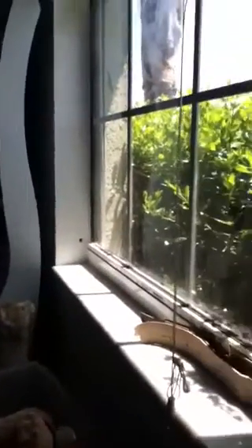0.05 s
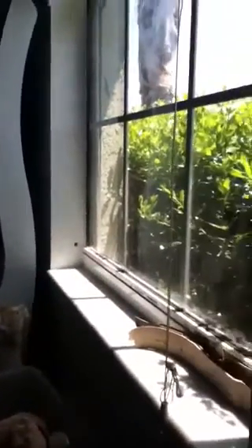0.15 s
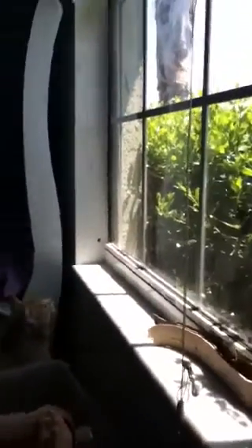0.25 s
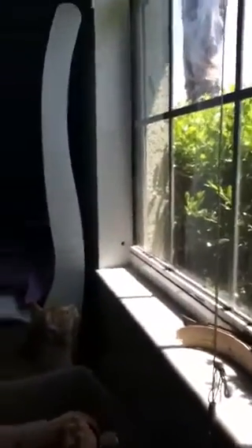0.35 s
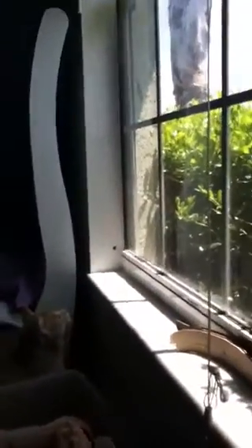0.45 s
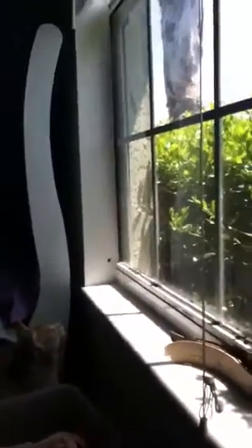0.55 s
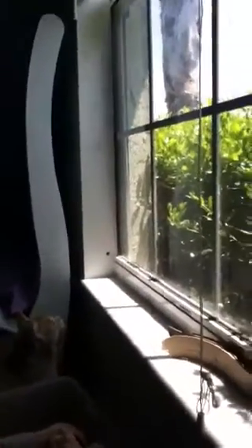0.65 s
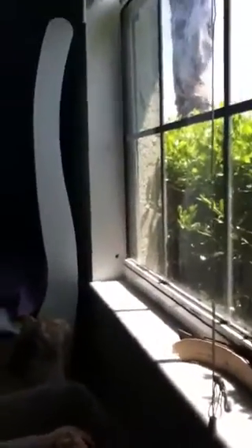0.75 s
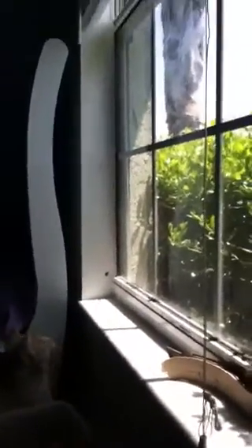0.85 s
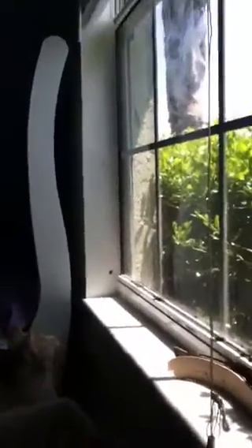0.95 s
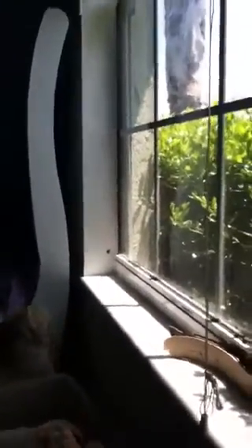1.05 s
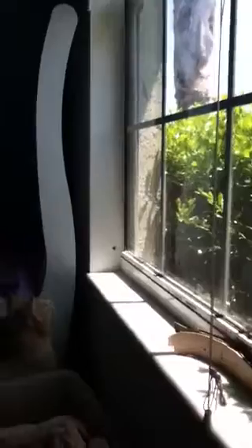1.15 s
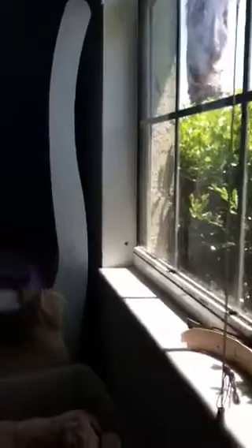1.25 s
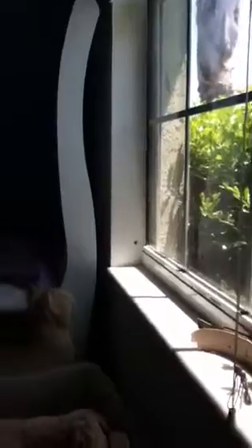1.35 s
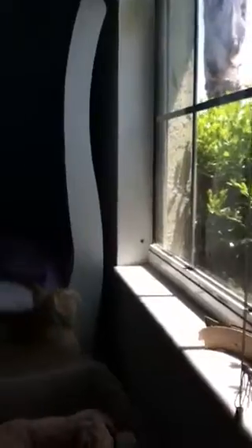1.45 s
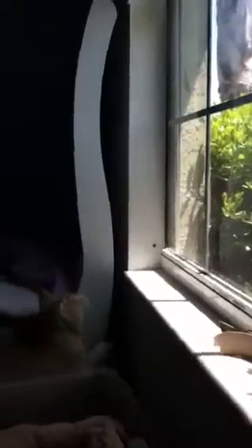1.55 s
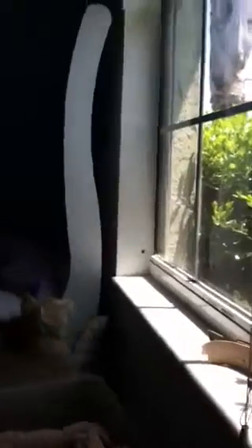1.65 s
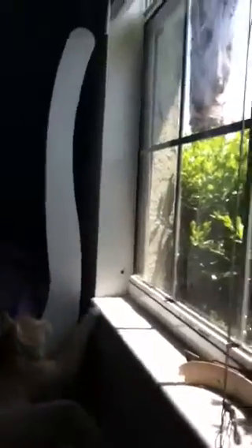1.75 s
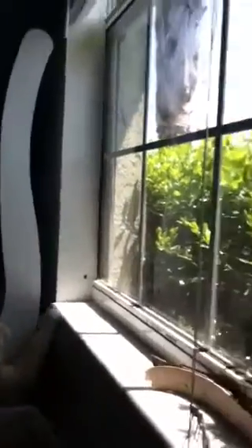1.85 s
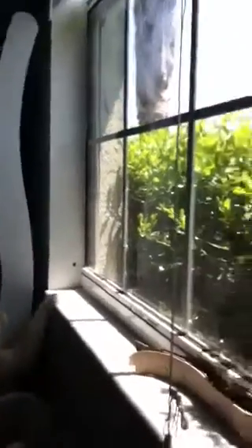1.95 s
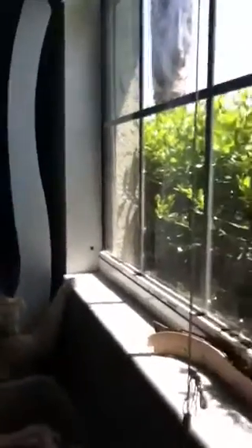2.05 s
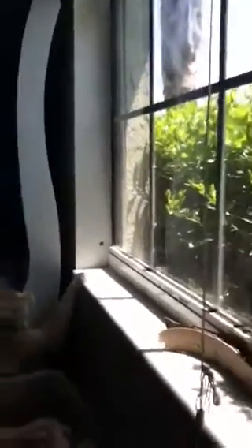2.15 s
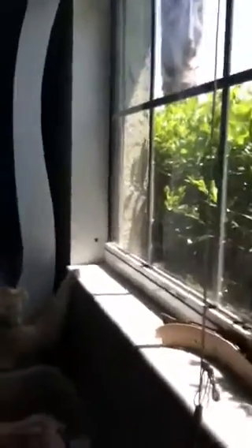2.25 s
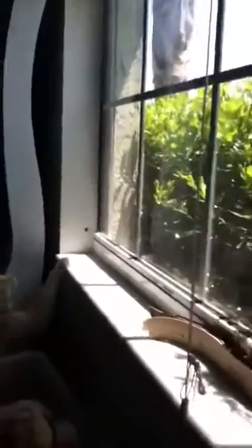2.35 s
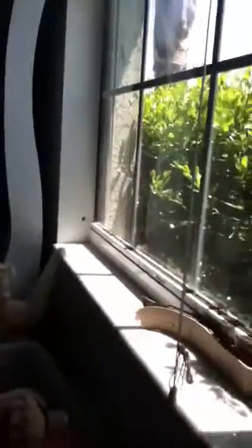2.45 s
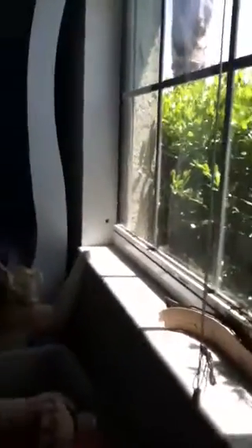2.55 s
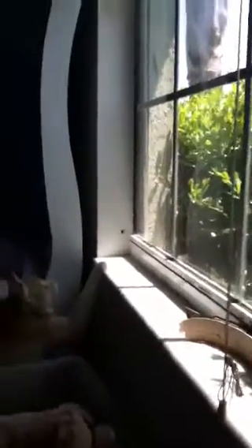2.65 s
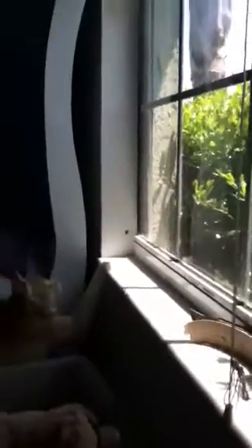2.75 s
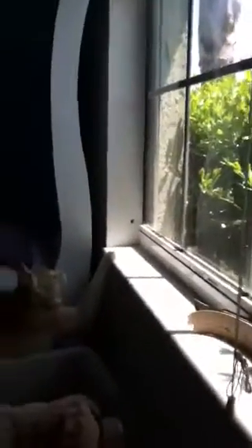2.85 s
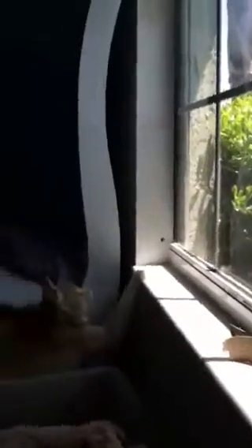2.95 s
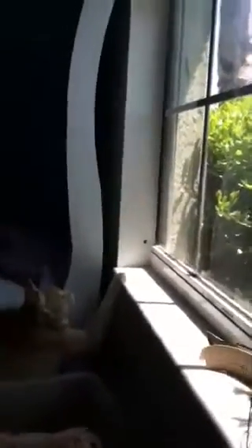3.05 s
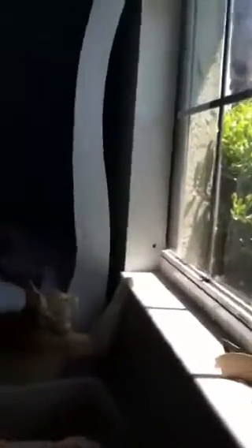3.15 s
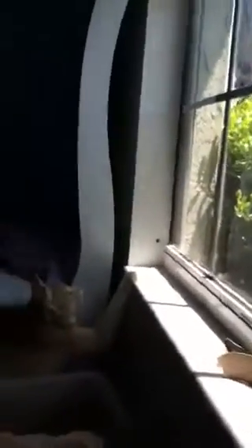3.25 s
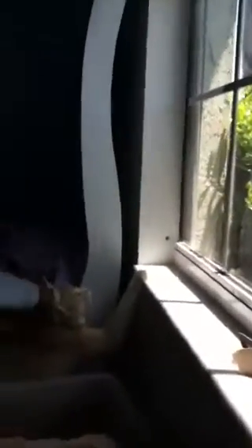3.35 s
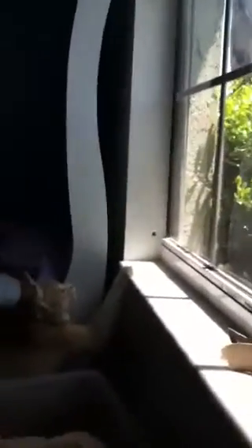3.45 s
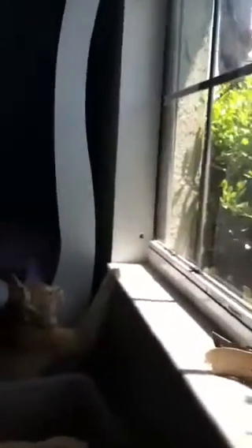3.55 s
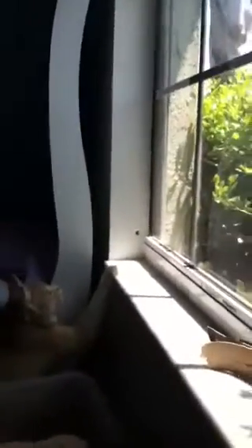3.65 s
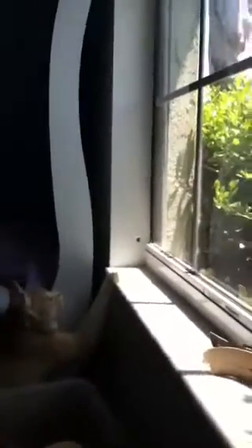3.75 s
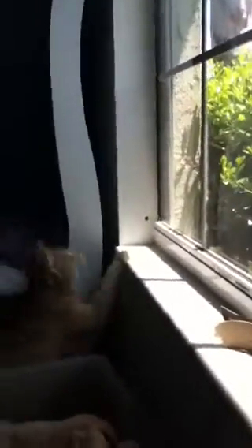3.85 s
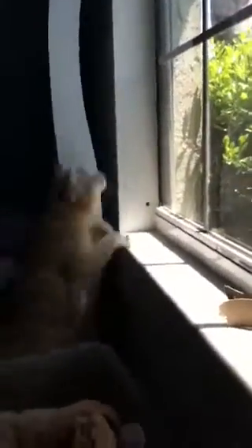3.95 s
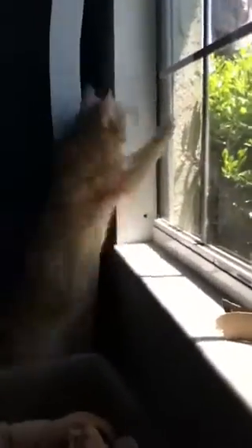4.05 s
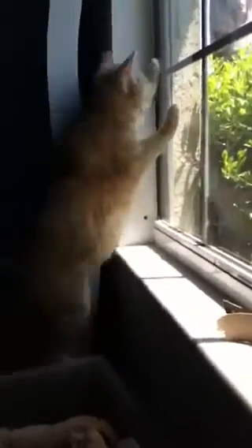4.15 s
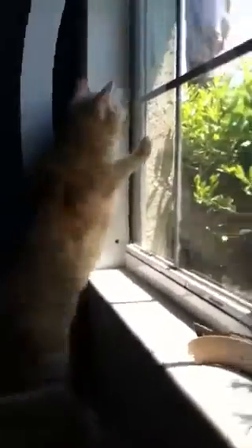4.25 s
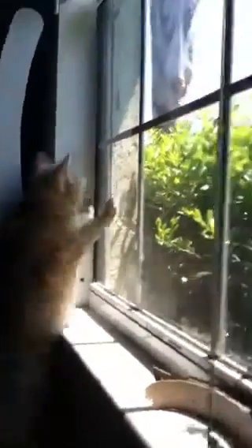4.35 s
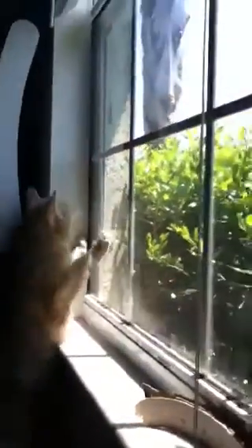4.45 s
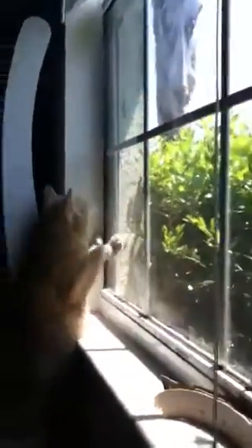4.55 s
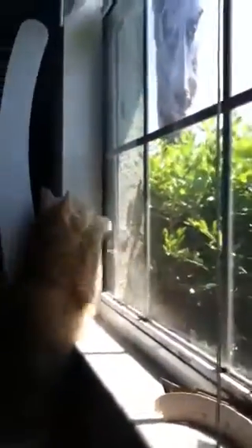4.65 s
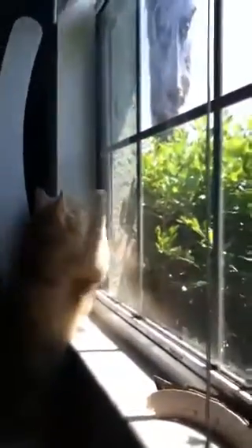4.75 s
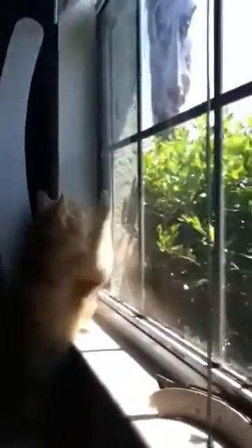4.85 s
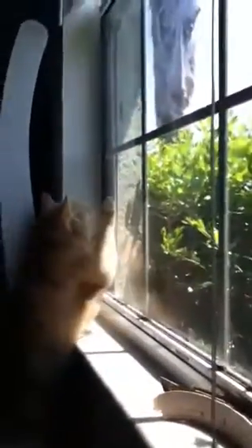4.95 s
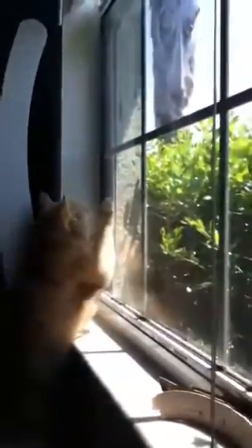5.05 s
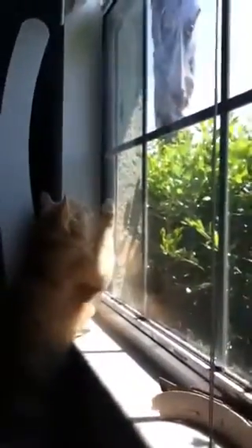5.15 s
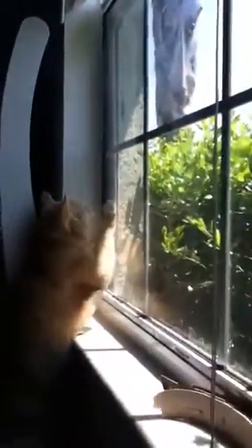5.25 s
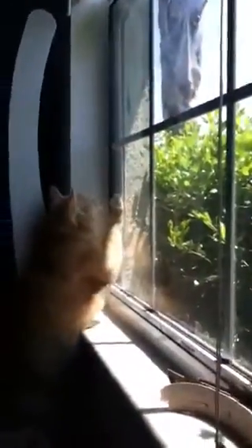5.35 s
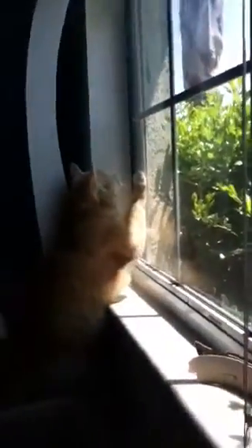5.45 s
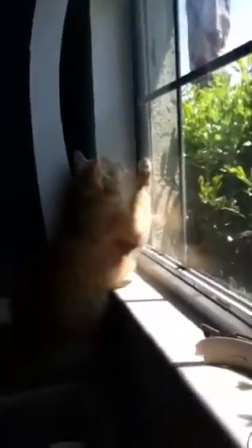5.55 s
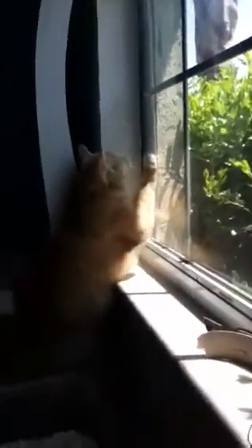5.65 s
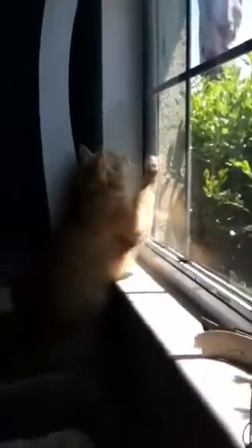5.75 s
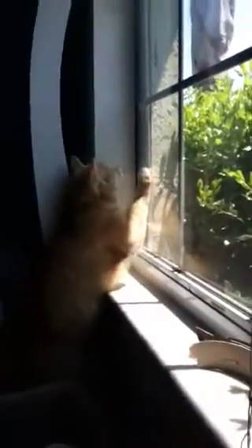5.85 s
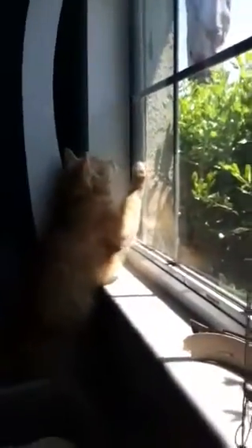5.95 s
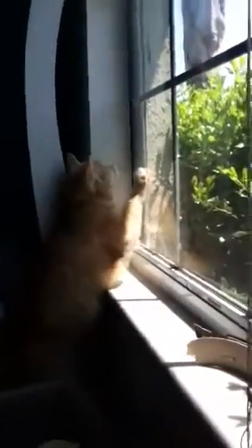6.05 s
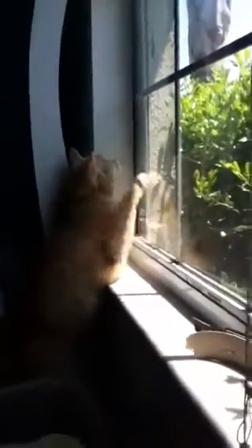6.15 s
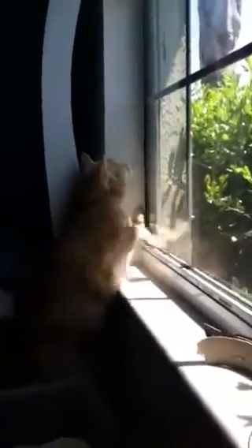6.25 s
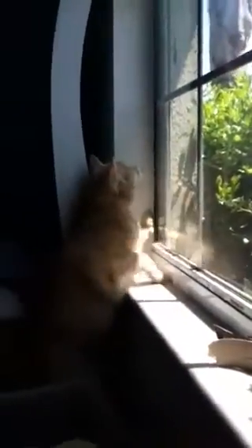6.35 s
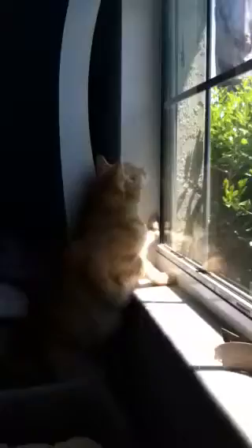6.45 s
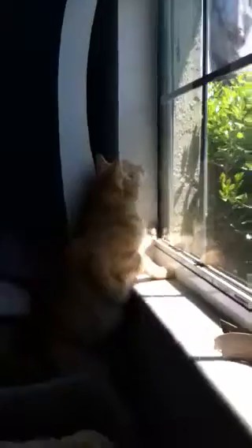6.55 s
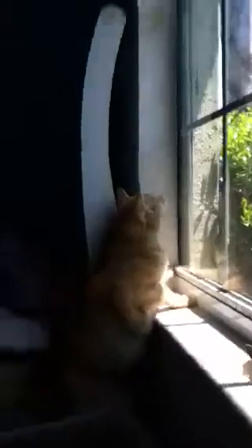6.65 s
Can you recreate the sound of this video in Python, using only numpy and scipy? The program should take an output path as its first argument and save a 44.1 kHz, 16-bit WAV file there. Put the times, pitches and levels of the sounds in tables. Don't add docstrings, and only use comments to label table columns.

```python
import sys
import numpy as np
from scipy import signal
from scipy.fft import rfft, irfft
from scipy.io import wavfile

SR = 44100
rng = np.random.default_rng(int(sys.argv[2]) if len(sys.argv) > 2 else 0)


def elevation(decibels):
    levels = np.asarray(decibels, float)
    return 10 ** (levels / 20)


def store_pcm(level_fs):
    pcm = np.round(np.clip(level_fs, -1, 1) * 32767).astype(np.int16)
    wavfile.write(sys.argv[1], SR, np.atleast_2d(pcm).T)


N = 295906


def rms_one(x):
    return x / np.sqrt(np.mean(x ** 2) + 1e-20)


def at_hz(points, hz):
    table_hz, values = np.array(points)[:, 0], np.array(points)[:, 1]
    return np.interp(np.log(np.maximum(hz, 1)), np.log(table_hz), values)


def band(x, low_hz, high_hz):
    return signal.sosfilt(signal.butter(2, [low_hz, high_hz], "band", fs=SR, output="sos"), x)


def band_shape(hz, low_hz, high_hz):
    return 1 / np.sqrt((1 + (low_hz / hz) ** 4) * (1 + (hz / high_hz) ** 4))


def ring(force, hz, t60):
    r, w = elevation(-60 / (t60 * SR)), 2 * np.pi * hz / SR
    return signal.lfilter([0, np.sin(w)], [1, -2 * r * np.cos(w), r * r], force + 1e-18)


def resonance(x, hz, width_hz):
    r = np.exp(-np.pi * width_hz / SR)
    poles = [1, -2 * r * np.cos(2 * np.pi * hz / SR), r * r]
    return signal.lfilter((1 - r * r) / 2 * np.array([1, 0, -1]), poles, x)


def blow(contact_s, size):
    t = np.arange(size) / SR
    return np.sin(np.pi * np.minimum(t / contact_s, 1)) ** 2


def add(out, s, sound, peak_db):
    at = max(round(s * SR), 0)
    sound = sound[:N - at]
    out[at:at + len(sound)] += elevation(peak_db) * sound / np.max(np.abs(sound))


def strokes(rows):
    t = np.arange(N) / SR
    rise, fall = 0.22, 0.57
    gain = np.zeros(N)
    for s, length, db in rows:
        shape = np.minimum((t - s) / rise, (s + length - t) / fall) / length
        gain += elevation(db) * np.clip(shape, 0, 1) ** 0.92
    return gain


# f/Hz, density/dB per Hz
HISS_SPECTRUM = [(20, 9), (58, -3), (83, -7), (228, -17), (1330, -30.5), (9400, -33.5), (14700, -37.5),
                 (16000, -30)]
# f/Hz, width/Hz, rms level/dB
HUM_BANDS = [(30.1, 10.6, -53.5), (58.5, 12, -52), (123.3, 9.7, -67)]
# f/Hz, level/dB
MAINS_LINES = [(29.8, -54), (59.6, -69)]
HISS_DB = -61
WHINE_HZ, WHINE_DB = 14992, -80


def room_tone():
    hz = np.fft.rfftfreq(N, 1 / SR)
    colour = elevation(at_hz(HISS_SPECTRUM, hz)) * band_shape(hz + 1, 56, 30000)
    hiss = irfft(rfft(rng.standard_normal(N)) * colour, N)
    out = hiss * elevation(HISS_DB + 1.5) / np.std(band(hiss, 370, 16400))
    for line_hz, width, db in HUM_BANDS:
        noise = rng.standard_normal(N + SR)
        hum = resonance(resonance(noise, line_hz, width), line_hz, width)
        out += elevation(db) * rms_one(hum[SR:])
    for line_hz, db in MAINS_LINES + [(WHINE_HZ, WHINE_DB)]:
        out += elevation(db) * np.sin(2 * np.pi * line_hz * np.arange(N) / SR)
    return out


# t/s, peak level/dB, ring f/Hz, room level/dB
DULL_KNOCKS = [(0.028, -31.5, 1000, -43), (0.229, -32.5, 1030, -37), (0.579, -45.5, 816, -18),
               (0.627, -57, 890, -23), (0.783, -47, 900, -13), (0.864, -61, 1010, -7),
               (1.139, -51, 1100, -30), (1.559, -43, 587, -24), (1.59, -44, 806, -27),
               (1.629, -49.5, 810, -32), (2.902, -41.5, 880, -16), (2.925, -49, 970, -24),
               (3.177, -40, 1200, -6.5), (3.253, -50, 886, -24), (3.301, -44.5, 695, -10),
               (3.898, -55, 660, -6.5), (6.521, -58, 800, -7), (6.602, -57, 750, -7)]
# t/s, peak level/dB, ring f/Hz, room level/dB
HARD_RAPS = [
    (0.002, -35, 610, -40),
    (1.812, -47, 800, -17),
    (1.921, -41.5, 836, -14),
    (3.374, -59, 916, -9),
    (4.029, -53.5, 1160, -14),
    (4.171, -37.5, 1090, -19),
    (4.232, -36.5, 590, -22),
    (4.462, -31.5, 1250, -5),
    (5.43, -48.5, 1360, -8),
]
KNOCK_CRACK_DB, RAP_CRACK_DB = -19, -7
FAINT_DB, FAINT_T60_S = -56.5, 0.015
DAMPING = 0.81


def knocks():
    near, send = np.zeros((2, N))
    t = np.arange(2000) / SR
    hits = [(*row, KNOCK_CRACK_DB) for row in DULL_KNOCKS] + [(*row, RAP_CRACK_DB) for row in HARD_RAPS]
    for s, db, hz, room_db, crack_db in hits:
        t60 = FAINT_T60_S * elevation(DAMPING * (FAINT_DB - db))
        push = blow(0.00054, size=2000)
        body = ring(push, hz, max(t60, .0042)) + 0.5 * push * push.sum() / 20
        crack = band(rng.standard_normal(2000), 2500, 5800) * elevation(-60 * t / 0.0058)
        add(near, s, body, db + 7.5)
        add(near, s, crack, db + crack_db + 11.5)
        add(send, s, body, db + room_db)
    return near, send


# t/s, peak level/dB
MATTRESS_PATS = [
    (0.029, -37),
    (.23, -38),
    (0.579, -38.5),
    (1.559, -37),
    (1.589, -33),
    (1.626, -35),
    (1.92, -47),
    (1.954, -40),
    (2.861, -41.5),
]
PAT_HZ, PAT_T60_S, PAT_CONTACT_S = 155, 0.018, 0.0019


def pats():
    out = np.zeros(N)
    for s, db in MATTRESS_PATS:
        add(out, s, -ring(blow(PAT_CONTACT_S, size=3000), PAT_HZ, PAT_T60_S), db)
    return out


# t/s, length/s, dull level/dB, bright level/dB
FUR_STROKES = [
    (1.104, 0.18, -61, -59),
    (1.234, 0.072, -63, -82),
    (5.165, 0.24, -60.5, -72),
    (5.713, 0.2, -56.5, -65),
    (6.152, 0.2, -50.5, -61),
    (6.52, 0.42, -53.5, -61),
]
# t/s, length/s, level/dB
BEDDING_RUSTLES = [
    (1.816, 0.25, -57),
    (2.387, 0.35, -59),
    (2.855, 0.9, -61),
]
GLASS_HISS = (5.6, .32, -64)
GLASS_HISS_HZ, GLASS_HISS_WIDTH_HZ = 6200, 2600


def brushing():
    grain_size = elevation(3.0 * np.minimum(rng.exponential(1, (3, N)), 3))
    hair, tips, folds = rng.standard_normal((3, N)) * grain_size
    dull = band(hair, 247, 900) + 0.72 * band(hair, 1580, 2420)
    bright = band(tips, 2550, 9200)
    cloth = band(folds, 1420, 3900) + 2.07 * band(folds, 520, 980)
    hiss = resonance(tips, GLASS_HISS_HZ, GLASS_HISS_WIDTH_HZ)
    hiss = resonance(hiss, GLASS_HISS_HZ, GLASS_HISS_WIDTH_HZ)
    s, length, dull_db, bright_db = np.transpose(FUR_STROKES)
    out = strokes(zip(s, length, dull_db)) * rms_one(dull)
    out += strokes(zip(s, length, bright_db)) * rms_one(bright)
    out += strokes(BEDDING_RUSTLES) * rms_one(cloth)
    return out + strokes([GLASS_HISS]) * rms_one(hiss)


# t/s, peak level/dB, higher board modes level/dB, edge modes level/dB, rattle level/dB
PAD_THUMPS = [
    (1.24, -41.5, -4, -26, -7.5),
    (1.703, -18, -4, -44, -16.5),
    (2.287, -21.5, -15, -7.5, -21),
    (2.365, -25.5, 4, -32, -19),
    (3.115, -22, -18.5, -11, -30),
    (3.176, -32, 8.5, 14.5, -33),
    (3.586, -40, -7, -6, -11.5),
]
# f/Hz, level/dB, t60/s, family (whole part: 0 lowest, 1 upper, 2 edge, 3 second)
SILL_MODES = [(104.2, -2, 0.098, 1.5), (166, 0, 0.082, 3), (203.2, -3, 0.1, 1), (240, -4.5, 0.16, 2.5),
              (290, -11.5, 0.2, 3), (349, -8, 0.091, 2.5), (443.6, -3, 0.079, 2), (512, -18, 0.032, 3.5),
              (620, -16.5, 0.048, 1.5), (790, -5, 0.1, 1)]


def thumps():
    out, t = np.zeros(N), np.arange(16000) / SR
    pushes = [blow(contact_s, size=len(t)) for contact_s in (0.004, 0.0019, 0.00079, 0.0043)]
    for s, db, upper_db, edge_db, rattle_db in PAD_THUMPS:
        family_db = [0, upper_db + 11.5, edge_db - 0.5, upper_db + 10]
        sound = np.zeros(len(t))
        for hz, mode_db, t60, family in SILL_MODES:
            k = int(family)
            level_db = mode_db + family_db[k] + rng.normal(0, 1.5)
            sound += elevation(level_db) * ring(pushes[k] / pushes[k].sum(), hz, t60)
        rattle = band(rng.standard_normal(len(t)), 560, 1024)
        rattle *= elevation(-60 * t / 0.19) * np.minimum(t / 0.0013, 1)
        start = s + .0035
        add(out, start, -band(sound, 90, 6000), db + 4.0)
        add(out, start, rattle, db + rattle_db)
    return out


# t/s, peak level/dB, strongest f/Hz, room level/dB
CLAW_TOUCHES = [(1.7111, -36.5, 3800, -3.5), (2.3719, -40, 3270, -3), (2.8598, -38.5, 2650, -5),
                (3.1776, -41.5, 2370, -12), (3.2527, -49.5, 2420, -4), (4.1648, -9, 7800, -11.5),
                (4.226, -9.5, 7200, -15), (4.2871, -31.5, 3230, -6.5), (4.358, -32, 2660, -5),
                (4.4348, -38, 2850, -7), (4.8821, -25.5, 7000, -9), (5.9768, -48, 6000, 0),
                (6.3994, -50, 6400, 3), (6.664, -37, 5530, -0.5),
                (4.1934, -32, 9100, -17),
    (4.2169, -29.5, 6100, 9),
    (4.241, -38, 7000, -10),
    (4.257, -30, 9600, -6),
    (1.754, -52, 4200, -17),
    (4.288, -28.5, 7000, -8),
    (4.4264, -44, 6100, 10),
]
# f/Hz, level/dB, t60/s
GLASS_MODES = [(4100, -5, .006), (5150, -11, .007), (5950, -8, .005), (6950, 0, .005), (8100, -2, .004),
               (9300, -2, .004), (10900, -4, .003), (13600, -26, .003)]
# delay/s, level/dB
EDGE_RETURNS = [(.0005, -3), (.0009, -2), (.0015, -9), (.0022, -13), (.0029, -15), (.0037, -14),
                (.0048, -19), (.006, -20), (.0075, -22)]
FRAME_HZ, FRAME_RING_S = 2700, .005
FRAME_BODY_DB, BODY_DB_PER_OCTAVE = 6, -13.5


def claws():
    near, send = np.zeros((2, N))
    hz = np.fft.rfftfreq(4096, 1 / SR) + 1
    dispersion = np.exp(-2j * np.pi * 0.17 * np.sqrt(hz))
    duller = band_shape(hz, 250, 5700)
    soft_tip = band_shape(hz, 50, 13200) ** 2 / np.sqrt(1 + (hz / 13500) ** 12)
    for s, db, top_hz, room_db in CLAW_TOUCHES:
        octaves = np.log2(hz / top_hz)
        slope_db = np.where(octaves < 0, 14 * octaves, -3 * octaves)
        body_db = FRAME_BODY_DB + BODY_DB_PER_OCTAVE * np.log2(top_hz / FRAME_HZ)
        body = elevation(body_db) * band_shape(hz, 170, 1250)
        returns = 1
        for late_s, echo_db in EDGE_RETURNS:
            delay_s = late_s * rng.normal(1, .12)
            returns = returns + elevation(echo_db) * np.exp(-2j * np.pi * hz * delay_s)
        tick = irfft((elevation(slope_db) + body) * soft_tip * dispersion * returns)
        modes = sum(elevation(mode_db + 2.0 * rng.normal()) * ring(tick, mode_hz, mode_t60)
                    for mode_hz, mode_db, mode_t60 in GLASS_MODES)
        t60 = max(FRAME_RING_S * (FRAME_HZ / top_hz) ** 2, .001)
        frame = FRAME_HZ / top_hz * ring(tick, top_hz, t60)
        add(near, s - .0008, tick + .15 * modes + .35 * frame, db + 2)
        to_room = irfft((elevation(0.86 * slope_db) * duller + body) * dispersion)
        add(send, s, to_room, db + room_db + 1.5)
    return near, send


# t of the fall/s, level/dB, top f/Hz
BIRD_WHISTLES = [
    (3.762, -62, 3150),
    (4.745, -59, 3000),
    (5.27, -59, 3050),
    (5.79, -59, 3050),
    (6.305, -58, 2950),
]
LEAD_S, LEAD_RISE_HZ = .055, 100
FALL_S, FALL_HZ, FADE_S = .062, 800, .035


def bird():
    out, t = np.zeros(N), np.arange(SR // 4) / SR
    corners = np.cumsum([0, LEAD_S, FALL_S, FADE_S])
    for s, db, top_hz in BIRD_WHISTLES:
        pitch_noise, level_noise = rng.standard_normal((2, len(t)))
        waver = 1 + 0.01 * rms_one(band(pitch_noise, 7.8, 80))
        pitch = top_hz - np.interp(t, corners, [LEAD_RISE_HZ, 0, FALL_HZ, FALL_HZ])
        broken_db = 2.5 * rms_one(band(level_noise, 15, 90))
        swell = elevation(np.interp(t, corners, [-9, 0, -1, -25], right=-80) + broken_db)
        add(out, s - LEAD_S, swell * np.sin(2 * np.pi * np.cumsum(pitch * waver) / SR), db)
    return out


# t/s, push level/dB
PANE_PUSHES = [
    (4.167, -23),
    (4.203, -21.5),
    (4.244, -23),
    (4.344, -37),
    (4.399, -30.5),
    (4.446, -29),
]
# f/Hz, level/dB, t60/s
PANE_MODES = [(22.1, 4.5, 0.29), (50, -5, 0.46), (95.4, -11, 0.49), (135, -7, 0.22), (320, -9, 0.14),
              (396, 0.5, 0.11)]


def pane():
    force = np.zeros(N)
    for s, db in PANE_PUSHES:
        add(force, s, blow(0.0034, size=600), db - 45.0)
    return sum(elevation(db) * ring(force, hz, t60) for hz, db, t60 in PANE_MODES)


# t/s, peak level/dB, f/Hz, t60/s
LATCH_PING = (4.288, -33, 3200, .03)


def latch():
    out = np.zeros(N)
    s, db, hz, t60 = LATCH_PING
    add(out, s, ring(blow(0.00018, size=3000), hz, t60), db)
    return out


# t/s, length/s, level/dB, bright part level/dB
CLAW_DRAGS = [
    (4.358, 0.026, -59, -25),
    (4.464, 0.0098, -44, 9),
    (4.473, 0.013, -36, -18),
    (4.48, 0.029, -59.5, 14),
    (5.444, 0.038, -58, -24),
]
# f/Hz, width/Hz, level/dB
SCRAPE_MODES = [(1140, 180, 13), (1740, 280, 8), (3280, 650, 12.5), (7000, 2300, -7)]


def drags():
    slip_size = elevation(3.5 * np.minimum(rng.exponential(1, N), 2.5))
    slips = rms_one((rng.random(N) < 7000 / SR) * slip_size * rng.choice([-1, 1], N))
    dull, bright, t = np.zeros(N), np.zeros(N), np.arange(N) / SR
    for s, length, db, bright_db in CLAW_DRAGS:
        touch = elevation(db) * np.clip(np.minimum((t - s) / 0.001, (s + length - t) / (0.38 * length)), 0, 1)
        dull += touch
        bright += elevation(bright_db) * touch
    *low_modes, (top_hz, top_width, top_db) = SCRAPE_MODES
    top = resonance(resonance(bright * slips, top_hz, top_width), top_hz, top_width)
    out = elevation(top_db + 14.0) * top
    for hz, width, db in low_modes:
        out += elevation(db + 7.5) * resonance(dull * slips, hz, width)
    return out, band(dull * slips, 510, 7700)


# f/Hz, t60/s
ROOM_DECAY = [(150, 0.26), (600, 0.39), (2000, 0.32), (6000, 0.28), (12000, 0.52)]


def room(x):
    t = np.arange(SR // 2) / SR
    onset = np.clip((t - .003) / 0.00043, 0, 1)
    tail = np.zeros(len(t))
    for hz in 100 * 2. ** np.arange(8):
        reflections = band(rng.standard_normal(len(t)) * onset, hz / np.sqrt(2), hz * np.sqrt(2))
        tail += reflections * elevation(-60 * t / at_hz(ROOM_DECAY, hz))
    tail = band(tail, 45, 8500)
    return signal.fftconvolve(x, tail / np.sqrt(np.sum(tail ** 2)))[:N]


def scene():
    knock, knock_send = knocks()
    claw, claw_send = claws()
    scrape, scrape_send = drags()
    sill, song = thumps(), bird()
    wet = elevation(12) * knock_send + elevation(-9.5) * sill + claw_send + elevation(-6) * song
    wet += elevation(-33) * scrape + elevation(1) * scrape_send
    near = knock + pats() + brushing() + sill + claw + song + pane() + latch() + scrape
    return (near + room(wet) + room_tone())[None]


def band_limit(x):
    return signal.sosfilt(signal.butter(12, 16460, fs=SR, output="sos"), x)


def record(dry):
    top_cut = signal.cheby2(12, 60, 16300, fs=SR, output="sos")
    mix = signal.sosfilt(top_cut, dry)
    return band_limit(mix)


dry = scene()
out = record(dry)
store_pcm(out)
```